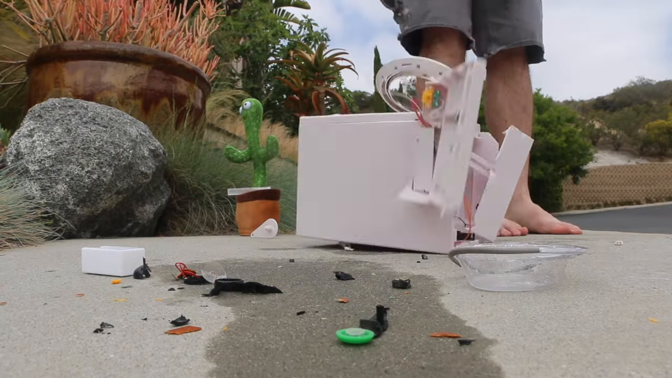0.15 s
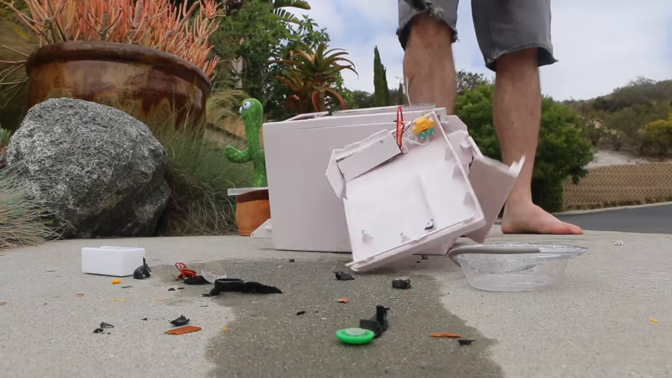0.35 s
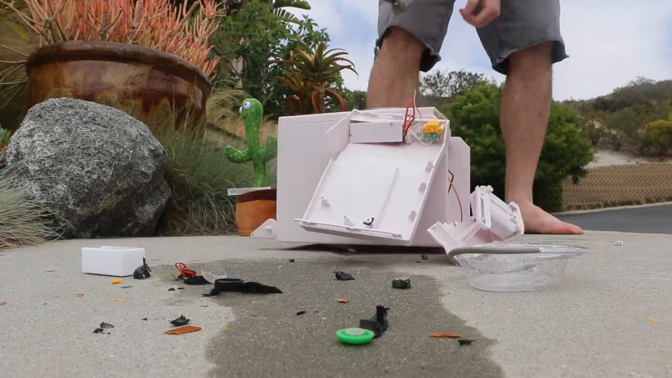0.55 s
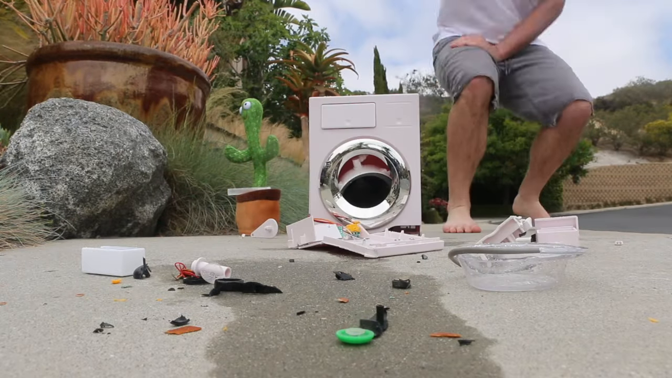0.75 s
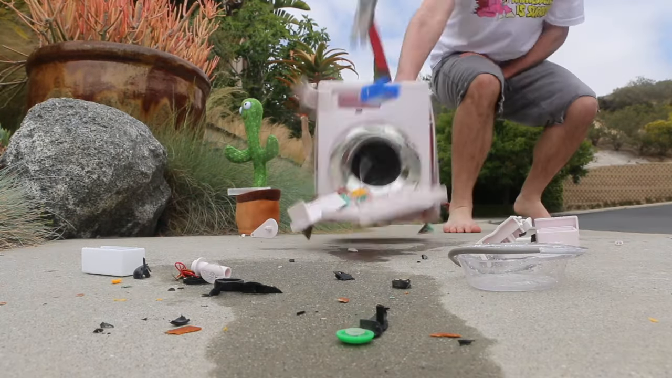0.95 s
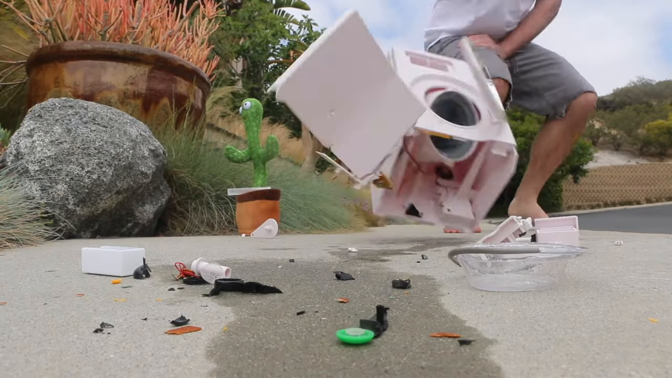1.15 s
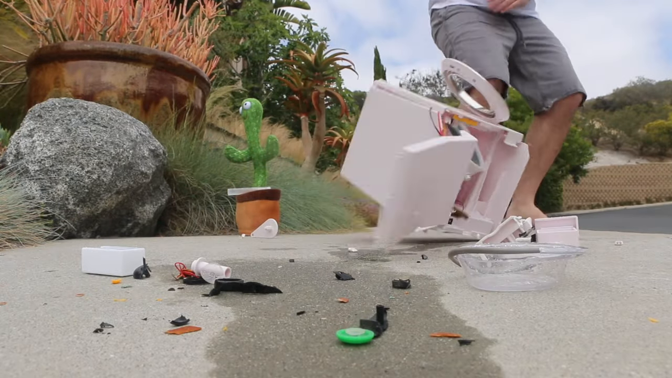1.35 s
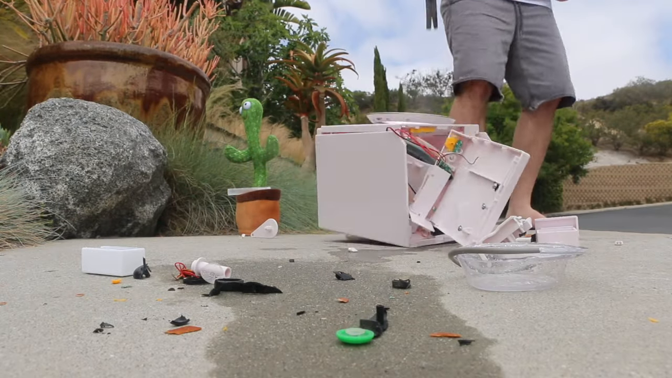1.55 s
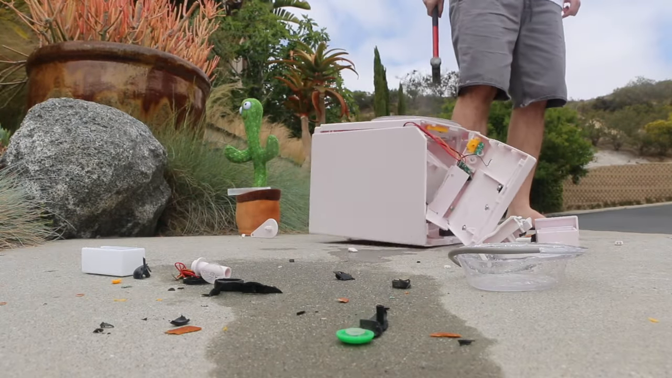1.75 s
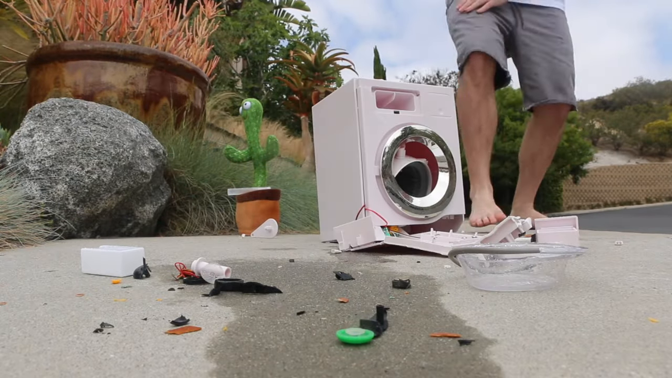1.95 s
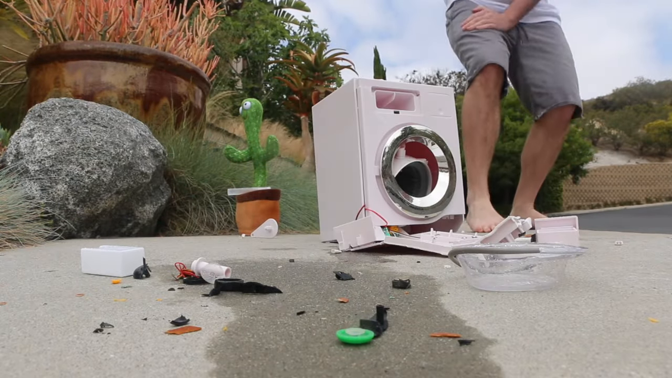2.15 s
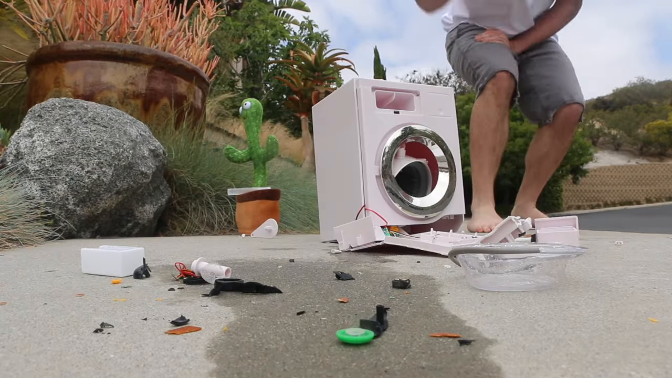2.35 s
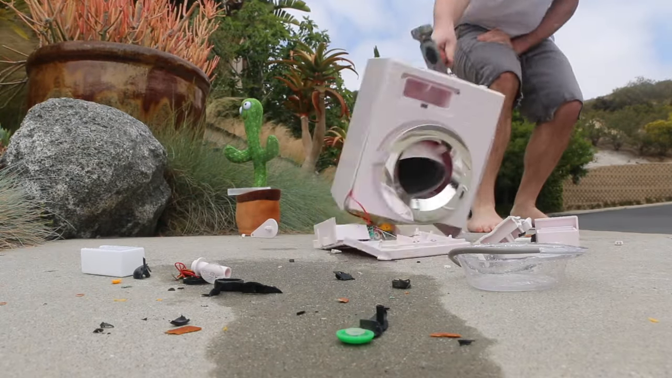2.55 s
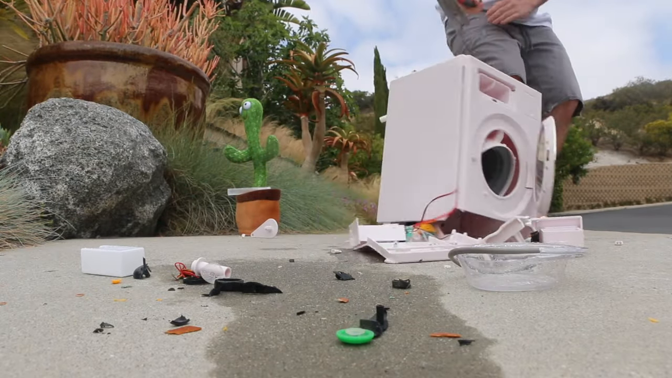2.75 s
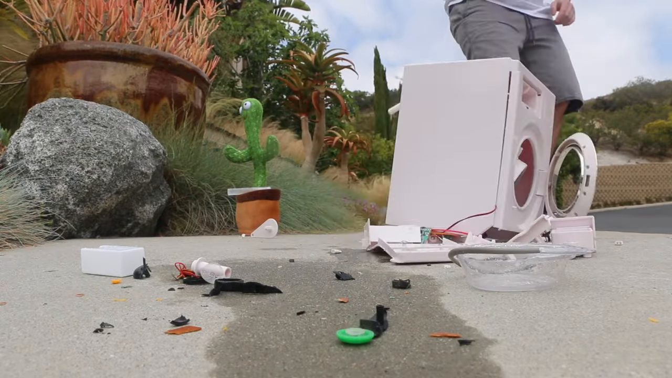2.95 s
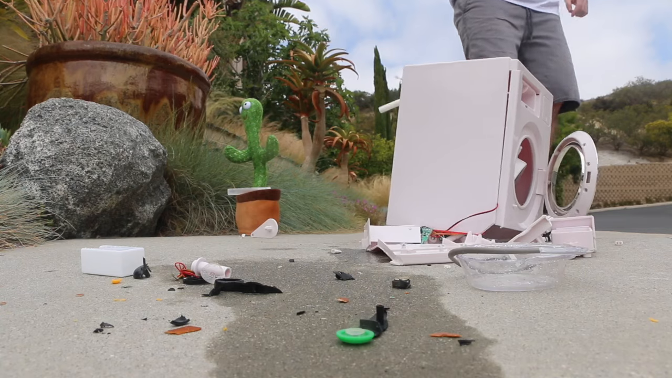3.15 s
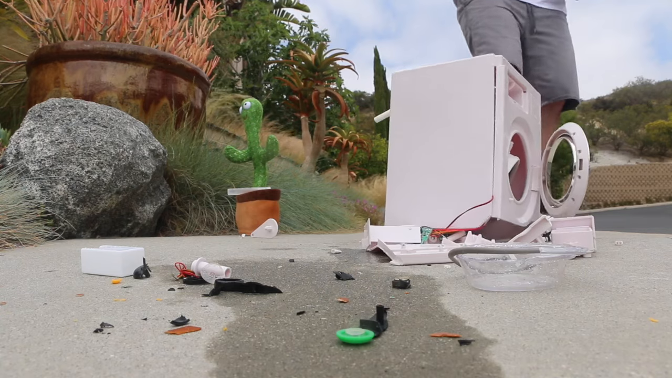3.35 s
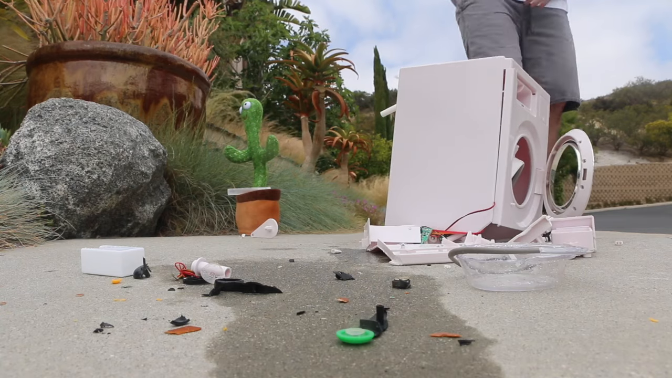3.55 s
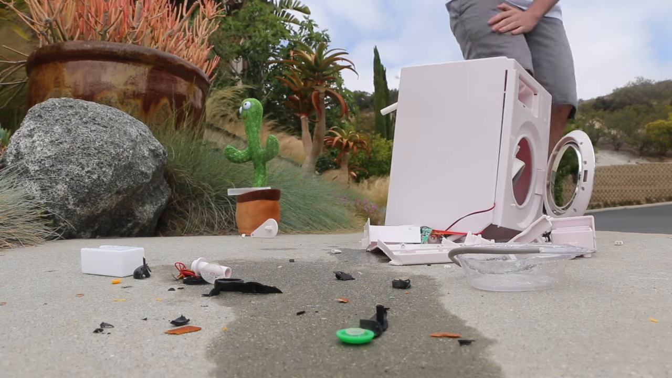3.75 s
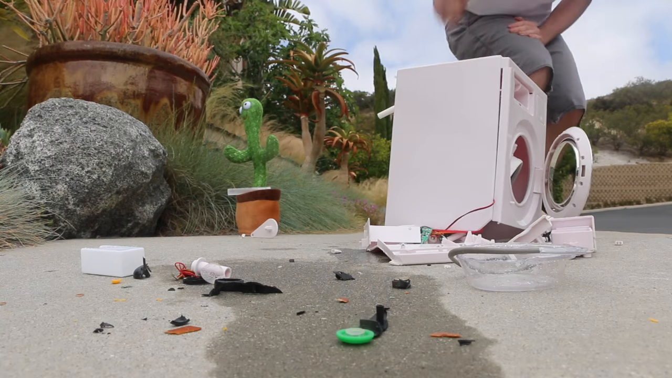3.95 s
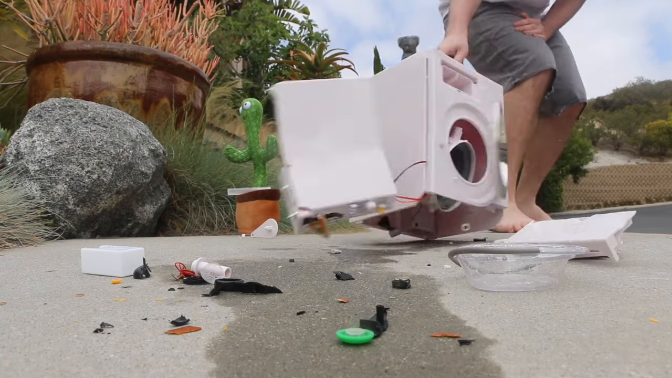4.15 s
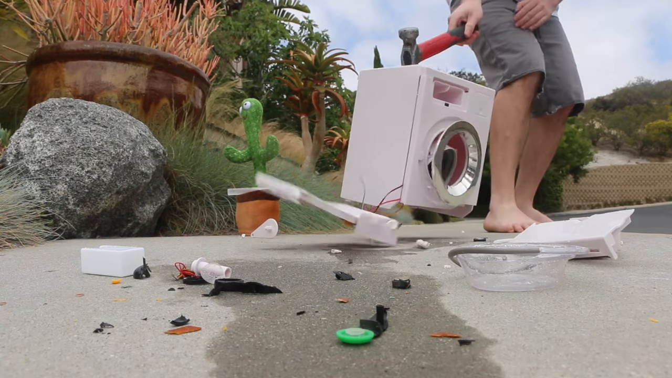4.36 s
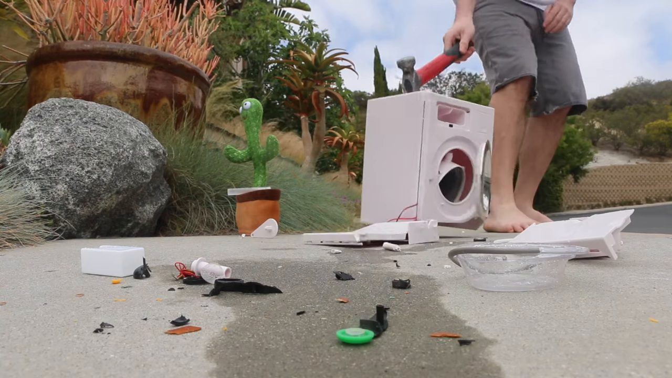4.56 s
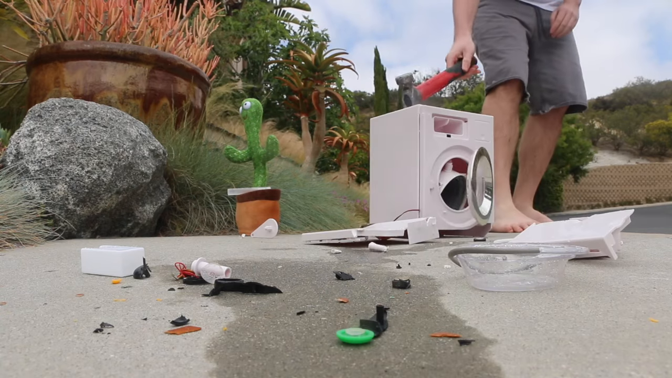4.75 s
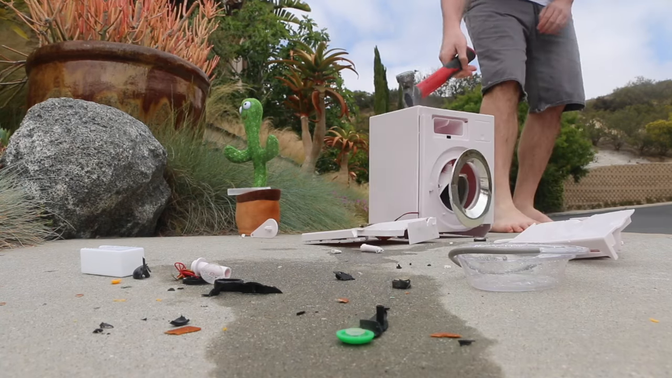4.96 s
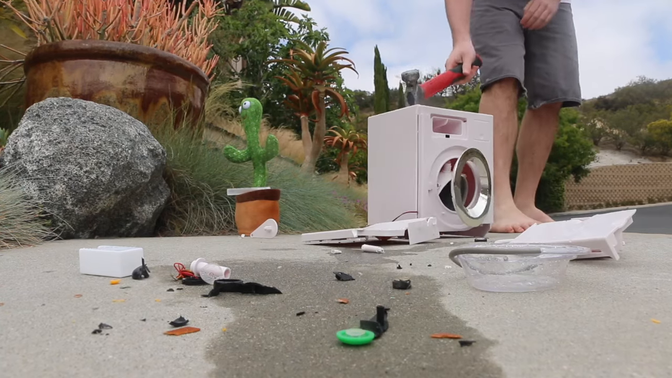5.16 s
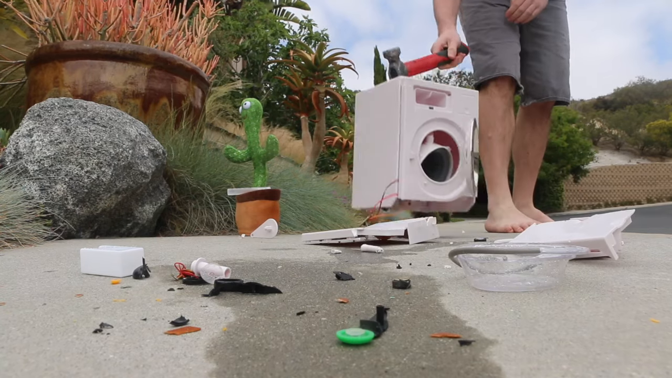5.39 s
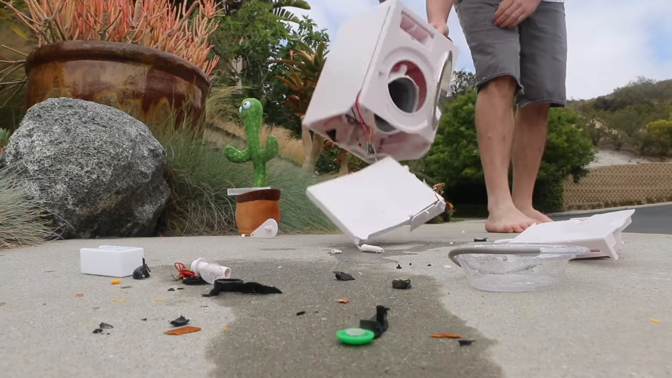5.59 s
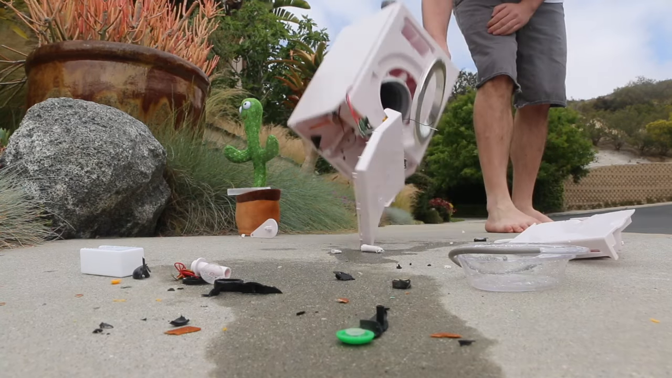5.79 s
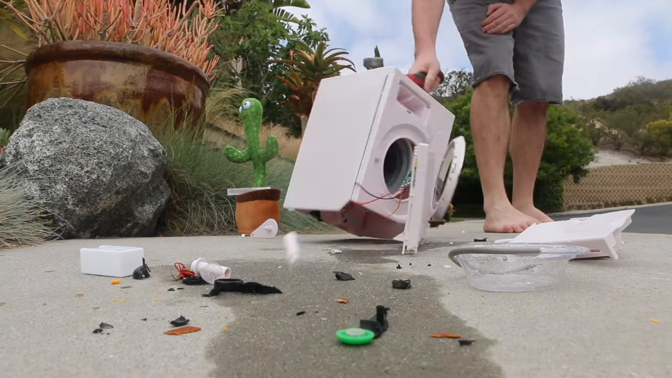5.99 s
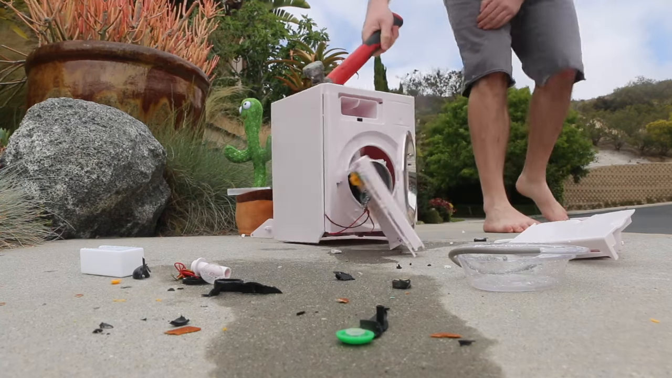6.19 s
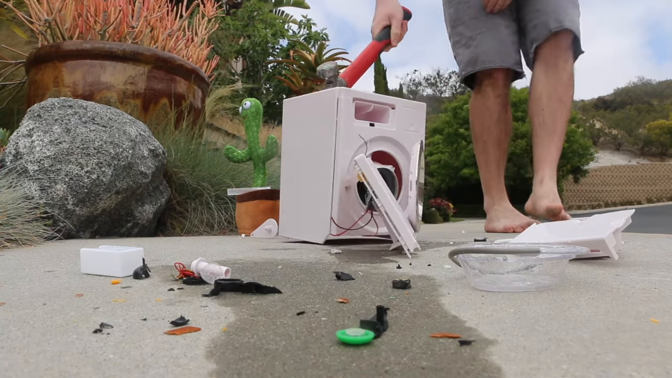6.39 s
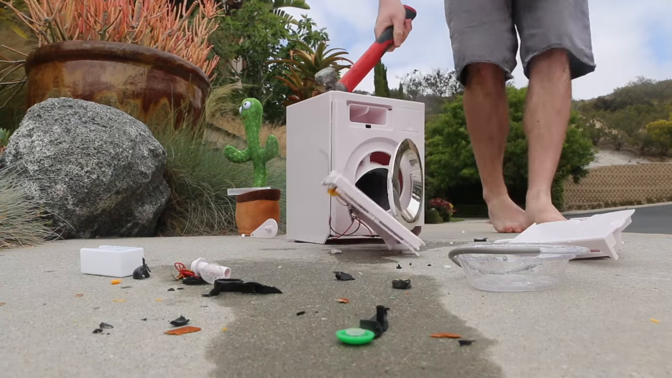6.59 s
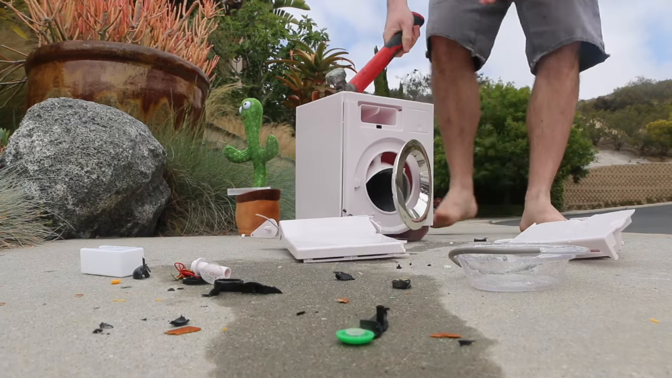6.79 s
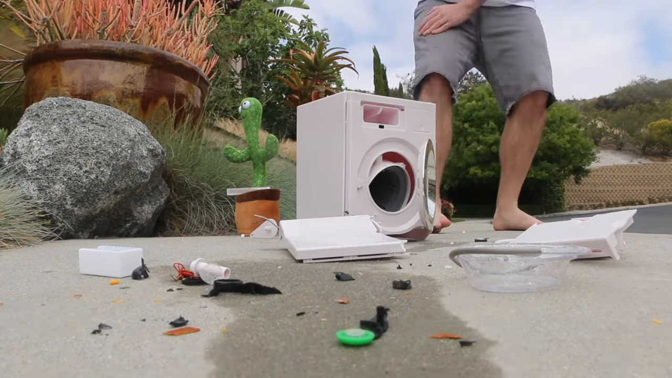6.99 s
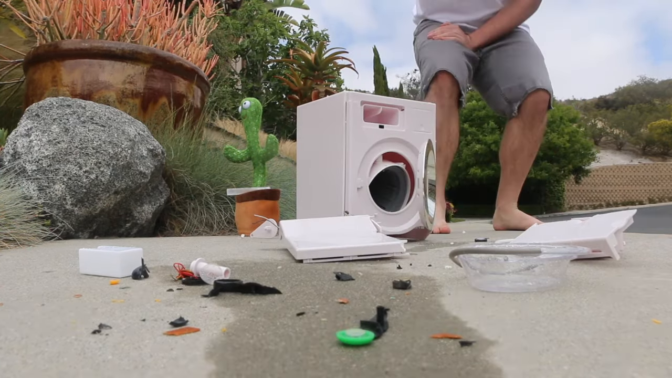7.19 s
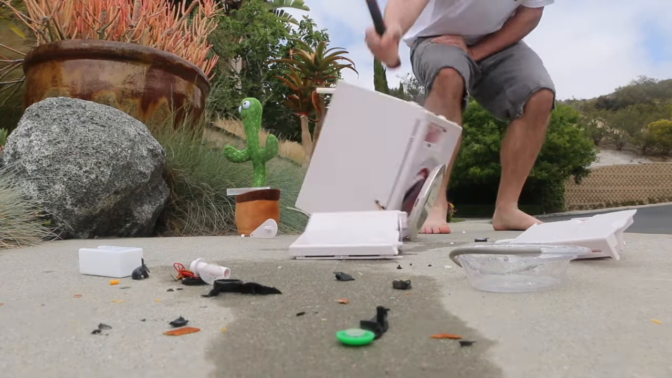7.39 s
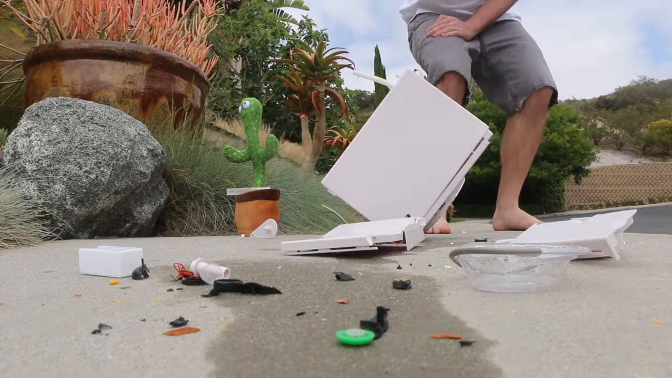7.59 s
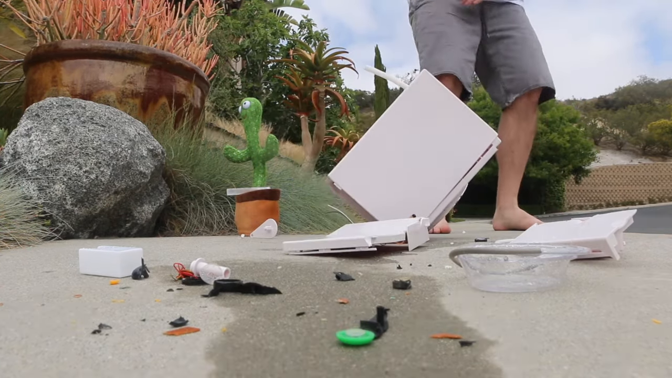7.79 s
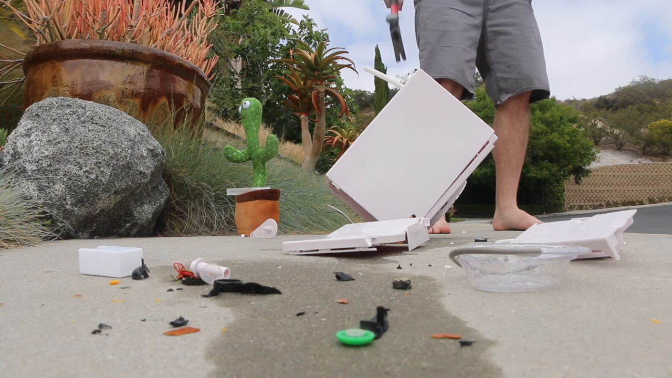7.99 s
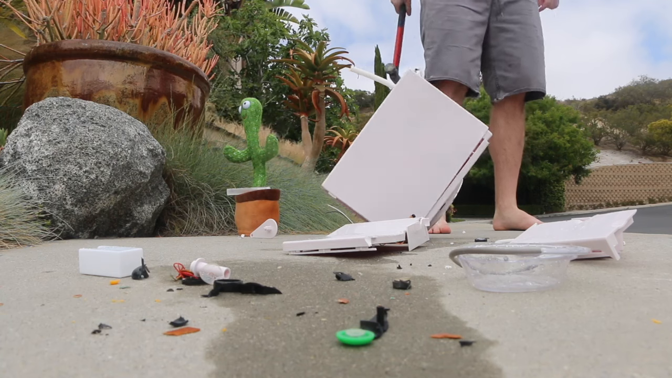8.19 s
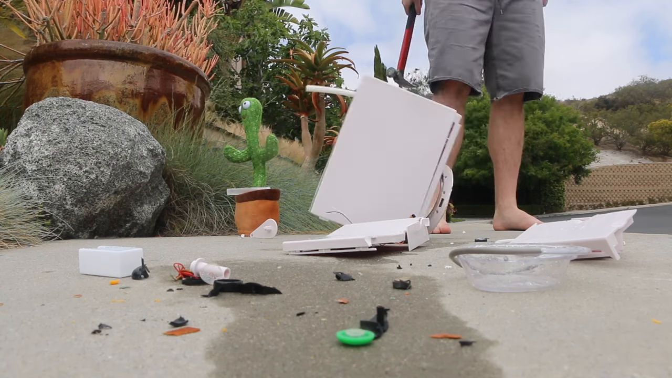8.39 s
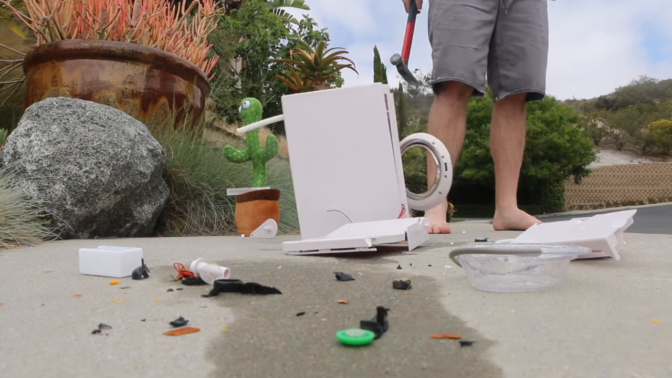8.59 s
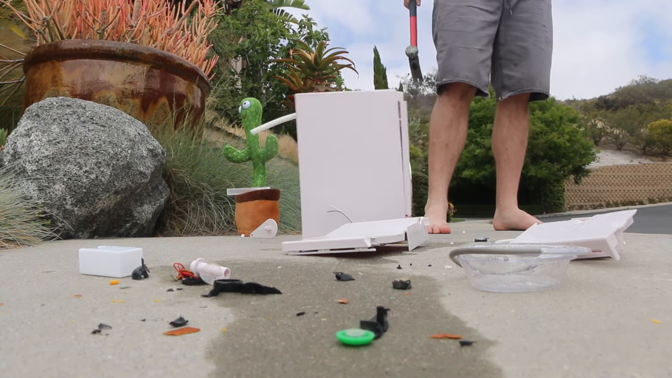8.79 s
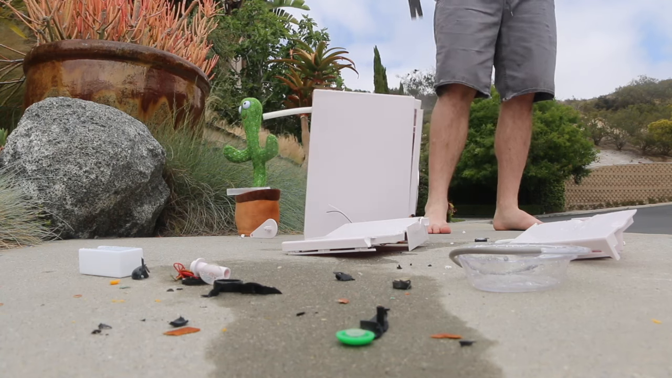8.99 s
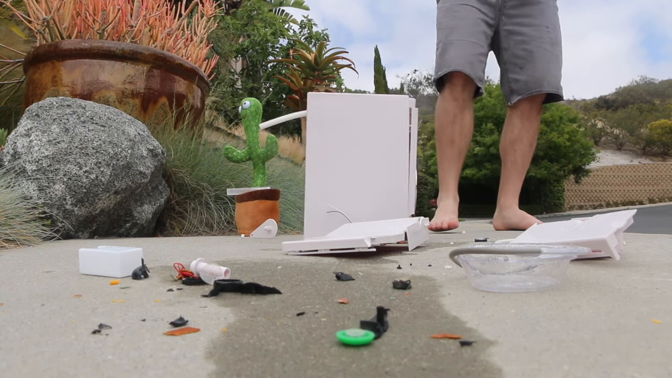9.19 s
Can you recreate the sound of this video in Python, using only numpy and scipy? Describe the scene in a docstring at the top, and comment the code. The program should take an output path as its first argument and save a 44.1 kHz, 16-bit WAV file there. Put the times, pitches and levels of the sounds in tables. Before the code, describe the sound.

Close outdoor stereo pickup of a hollow plastic toy washing machine being smashed on concrete. It starts mid-tumble, with boxy knocks and clacks until about 0.6 s, then a short lull. A very loud, slightly distorted hammer crack at 1.0 s sends it clattering and rattling until 1.9, with small high pings from a hard fragment. A second crack at 2.5 brings denser rattling that fades by 3.2; a third at 4.05 is followed by sharp clacks, a drop at 4.7 and knocks near 5.0. From 5.8 to 6.9 it bangs repeatedly, casing booming and loose panels rattling, with another ping at 6.3. Low wind buffets around 7.0 and 7.3, and the last crack lands at 7.35. Sparse scraping follows, then firm thuds from 8.45 to 9.2 as it rocks to rest. A soft distant wash and faint wavering low hum continue underneath.

```python
"""Four hammer blows crack a plastic toy washing machine on concrete outdoors, close to the microphone.
Between them it tumbles, clacks and rattles, is lifted and dropped, and at the end it rocks to rest.
Impacts are noisy contact forces ringing casing, drum, panel and snap filters; rattling is sparse ticks.
A small hard piece rings as decaying sines; gusts, a distant wash and a wavering hum lie underneath.
The loudest peaks overload and are rounded off."""
import sys
import numpy as np
from scipy import signal
from scipy.fft import rfft, irfft
from scipy.io import wavfile
from scipy.ndimage import uniform_filter1d

SR = 44100
rng = np.random.default_rng(int(sys.argv[2]) if len(sys.argv) > 2 else 0)


def unload_audio(sound):
    """Save the sound as a 16-bit wav file, at the path given as the first command line argument."""
    columns = np.transpose(np.atleast_2d(sound))
    # keep every value between -1 and 1, then stretch to whole-number steps
    steps = np.round(np.clip(columns, -1, 1) * 32767)
    wavfile.write(sys.argv[1], SR, steps.astype(np.int16))


N = 407484
SIZE = 2 ** 14  # samples in one impact
HZ = np.fft.rfftfreq(SIZE, 1 / SR)


def amp(db):
    """Decibels to gain."""
    return 10 ** (np.asarray(db) / 20)


def evened(x):
    """Scales along the last axis to rms 1."""
    return x / np.sqrt(np.mean(x ** 2, -1, keepdims=True) + 1e-20)


def read(points, hz):
    """Reads a table along a log-frequency axis."""
    f, value = np.transpose(points)
    return np.interp(np.log(hz + 1), np.log(f + 1), value)


def add(mix, s, sound):
    """Mixes a sound in at s seconds."""
    part = mix[:, max(round(s * SR), 0):][:, :sound.shape[-1]]
    part += sound[..., :part.shape[1]]


def colour(x, points):
    """Filters a long signal by a table of (frequency [Hz], gain [dB])."""
    return irfft(rfft(x) * amp(read(points, np.fft.rfftfreq(N, 1 / SR))), N)


def causal(gain):
    """Gives a magnitude response the phase of something that rings only after it is struck."""
    log_gain = np.log(np.maximum(gain, gain.max() * 1e-4))
    circle = np.concatenate([log_gain, log_gain[-2:0:-1]])
    minimum_phase = np.exp(np.conj(signal.hilbert(circle)))
    return minimum_phase[:len(gain)]


def resonances(modes):
    """Response of a part: its modes, falling off steeply below and above them."""
    power = sum(amp(db) ** 2 / (1 + ((HZ - hz) / (width / 2)) ** 2) for hz, width, db in modes)
    low_skirt = (1.14 * modes[0][0] / (HZ + 1)) ** 4
    high_skirt = (HZ / (1.23 * modes[-1][0])) ** 4
    return causal(np.sqrt(power / (1 + low_skirt + high_skirt)))


def parts():
    """Responses of the hollow casing, the drum inside it, the flat panels and snapping edges."""
    # modes of each part: (frequency [Hz], width [Hz], relative level [dB])
    casing_modes = [(153, 56, -7.5), (247, 40, -3), (356, 150, -4), (449.5, 34, 1), (535, 73, -1.5),
                    (610, 26, -3.5)]
    drum_modes = [(750, 360, -1), (970, 37, -5.5), (1002.5, 52, 7.5), (1090, 1000, -4.5)]
    panel_modes = [(1420, 49, -16.5), (1760, 400, 2), (2100, 1050, -4), (2836, 260, -1)]
    # spectrum of a hard edge snapping on contact: (frequency [Hz], relative level [dB])
    snap_spectrum = [(1500, -11.5), (3300, 1.5), (5200, -2.5), (7000, -8), (9500, -12), (11000, -12.5),
                     (12500, -43)]
    snap = causal(amp(read(snap_spectrum, HZ)))
    return resonances(casing_modes), resonances(drum_modes), resonances(panel_modes), snap


def own_modes(mode_db, mode_width_hz, count=12):
    """Every impact adds a few narrow resonances of its own, from 1.3 to 9.1 kHz."""
    pitch, size = rng.random((2, count, 1))
    hz = 1300 * 7 ** pitch
    return 1 + (amp(mode_db) * size / (1 + 2j * (HZ - hz) / mode_width_hz)).sum(0)


def contact_force(t, t60, chatter_per_s, first_db, first_s, lump_db):
    """Strength of contact: a hard first hit, then dying chatter of the plastic against itself."""
    lumps = amp(lump_db * rng.standard_normal(SIZE).clip(-2, 2))
    contacts = (rng.random(SIZE) < chatter_per_s / SR) * lumps
    # each contact dies with a 1.4 ms time constant, over a steadier fine crunch
    bursts = signal.lfilter([1], [1, -np.exp(-1 / (0.0014 * SR))], contacts)
    chatter = evened(bursts) + 1.4
    first_hit = amp(first_db) * np.exp(-t / first_s)
    return (chatter + first_hit) * amp(-60 * t / max(t60, .02))


def strike(row, responses, chatter_per_s, first_db, first_s, lump_db, focus_db, mode_db, tilt_db):
    """One impact as mid and side: noise shaped by the contact force drives all four parts."""
    s, thud_hz, *levels_db, t60 = row
    casing, drum, panels, snap = responses
    t = np.arange(SIZE) / SR
    force = contact_force(t, t60, chatter_per_s, first_db, first_s, lump_db)
    # the side that lands stiffens casing and panels differently and favours one region of the low modes
    shift = (thud_hz / 430) ** 0.073
    focus = 1 + amp(focus_db) / (1 + 2j * (HZ - thud_hz) / 55)
    casing = np.interp(HZ / shift, HZ, casing) * focus
    # one panel region, a fixed multiple above the thud, is favoured too
    clack_ratio, clack_width_hz, clack_db = 4.5, 500, 0
    clack = 1 + amp(clack_db) / (1 + 2j * (HZ - clack_ratio * thud_hz) / clack_width_hz)
    panels = np.interp(HZ / shift, HZ, panels) * clack
    piece = own_modes(mode_db, mode_width_hz=130)
    # harder contacts are shorter, so a louder snap is brighter
    db_per_octave = tilt_db + 0.26 * (levels_db[-1] + 21.5)
    brightness = amp(db_per_octave * np.log2(np.clip(HZ, 3000, 11000) / 3000))
    out = np.zeros((2, SIZE))
    for response, db in zip((casing, drum, panels * piece, snap * piece * brightness), levels_db):
        drive = rfft(force * rng.standard_normal((2, SIZE)))
        out += amp(db) * evened(irfft(drive * response))
    fade = np.minimum(1, 10 * (1 - t / t[-1])) ** 2
    level_span_s = .02  # each part carries the energy of its level held this long
    return s, out * fade * np.sqrt(level_span_s * SR / SIZE)


def thump(hz, db, t60):
    """A short low boom: a decaying sine."""
    t = np.arange(SIZE) / SR
    return amp(db - 60 * t / t60) * np.sin(2 * np.pi * hz * t)


def hammer(responses, blow_db=6):
    """Steel cracks the casing and drives it against the slab; the first milliseconds are by far the loudest."""
    # hammer blows, levels before the blow gain: (time [s], thud pitch [Hz], thud level [dB],
    # drum ring level [dB], panel clack level [dB], snap level [dB], t60 [s])
    blows = [(0.983, 345, -10.5, -16.5, -20.5, -18.5, 0.14), (2.483, 520, -18, -17, -20.5, -19.5, 0.15),
             (4.047, 287, -16.5, -14, -21.5, -20, 0.11), (7.355, 340, -15, -19, -18.5, -17.5, 0.12)]
    out = np.zeros((2, N))
    for row in blows:
        s, crack = strike(row, responses, chatter_per_s=1800, first_db=20, first_s=.003,
                          lump_db=-3.0, focus_db=3.5, mode_db=-2, tilt_db=2.0)
        boom = thump(hz=65, db=-18, t60=0.06)
        add(out, s, amp(blow_db) * crack + boom * [[1], [0]])  # the low boom is mid only
    return out


def shared(strength_db, hardness):
    """Splits a knock: a flat face booms the casing, a corner rings the drum, an edge clacks and snaps."""
    # shares from flat face through corner and loose panel to sharp edge, before their sum is evened:
    # (hardness [0-1], casing [dB], drum [dB], panel clack [dB], snap [dB])
    shares = [(0, 2, -12.5, -19, -26.5), (.5, -6.5, -2.5, -6.5, -6), (.75, -11, -16, 6, -15.5),
              (1, -38, -11.5, -4, -0.5)]
    steps, *parts_db = np.transpose(shares)
    db = np.array([np.interp(hardness, steps, part) for part in parts_db])
    total_db = 10 * np.log10(np.sum(amp(db) ** 2))
    return strength_db + db - total_db


def tumbling(responses):
    """Corners and loose panels hit the concrete as the toy tumbles, somersaults, spins, drops and rocks."""
    # casing and panels landing on concrete:
    # (time [s], strength [dB], hardness [0 flat face - 1 sharp edge], thud pitch [Hz], t60 [s, at least 0.02])
    knocks = [ (0.013, -18, 0.28, 480, 0.44), (0.081, -16, .7, 380, 0.092), (0.101, -19, 0.64, 400, 0.021),
              (0.153, -18.5, 0.34, 348, 0.24), (0.192, -16, 0.65, 530, 0.065),
              (0.198, -13.5, 0.26, 354, 0.27), (0.232, -13.5, 0.21, 410, 0.074),
              (0.265, -14, 0.35, 397, 0.23), (0.347, -11, 0.18, 485, 0.21), (0.484, -16.5, 1, 585, 0.024),
              (0.532, -17.5, 0.43, 550, .15), (0.564, -23.5, 0.89, 590, 0.048),
              (0.577, -13, 0.06, 466, 0.03), (1.227, -10, 0.27, 400, 0.37), (1.238, -13, 0.34, 424, 0.043),
              (1.349, -15.5, 0.36, 440, 0.13), (1.4, -16, 0.13, 600, 0.04),
              (1.432, -16.5, 0.82, 373, 0.031), (1.474, -21, 0.23, 445, 0.1),
              (1.503, -13.5, 0.078, 450, 0.059), (1.554, -17, 0.1, 553, 0.049),
              (1.563, -14, 0.33, 400, 0.086), (1.612, -20.5, 0.086, 570, 0.045),
              (1.672, -16, 0.27, 570, 0.088), (1.703, -18, 0.79, 415, 0.026),
              (1.868, -17, 0.21, 384, 0.087), (1.894, -18, .13, 490, 0.082), (2.664, -21, 0.46, 344, 0.048),
              (2.721, -11.5, 0.26, 265, 0.084), (2.786, -20.5, 0.6, 465, 0.2),
              (2.804, -15, 0.26, 430, 0.089), (2.863, -19.5, 0.38, 346, 0.12), (2.928, -20, 0.9, 415, 0.16),
              (2.983, -17, 0.34, 450, 0.14), (3.037, -24, .02, 338, 0.032), (3.065, -28, .55, 500, 0.059),
              (3.115, -27.5, 0.95, 630, 0.04), (3.23, -33.5, 0.63, 660, 0.072),
              (4.282, -16, 0.59, 565, .14), (4.333, -19.5, 0.38, 430, 0.086),
              (4.402, -19.5, 0.95, 463, 0.32), (4.462, -20, 1, 350, 0.02), (4.47, -12, .95, 470, 0.14),
              (4.59, -28.5, .92, 550, 0.025), (4.679, -11, 0.56, 493, 0.037), (5.012, -16, 0.19, 470, 0.39),
              (5.027, -14, 0.18, 500, 0.054), (5.176, -18, 0.16, 250, .13), (5.549, -23.5, 0.53, 517, 0.2),
              (5.855, -14.5, 0.14, 580, 0.15), (5.878, -23.5, 0.32, 477, 0.072),
              (5.89, -9.5, 0.46, 445, 0.09), (5.92, -10.5, .53, 503, 0.26), (6.011, -19.5, 0.4, 470, .07),
              (6.14, -12.5, 0.21, 540, 0.2), (6.172, -17, 0.071, 550, 0.11),
              (6.273, -11.5, 0.3, 473, 0.091), (6.361, -9.5, 0.16, 356, 0.12),
              (6.445, -29, 0.65, 445, .045), (6.528, -13, 0.34, 356, 0.14), (6.545, -13.5, 0.16, 308, .055),
              (6.646, -13, 0.19, 370, 0.091), (6.709, -9, 0.11, 434, 0.33), (6.759, -16.5, 0.91, 520, .16),
              (6.891, -13.5, 0.13, 355, 0.094), (7.581, -18.5, 0.39, 343, 0.72),
              (7.775, -24.5, 0.37, 403, 0.28), (7.867, -29.5, 0.42, 370, 0.099),
              (8.169, -23.5, 0.62, 430, 0.062), (8.23, -37.5, .72, 415, 0.053),
              (8.451, -20.5, 0.12, 634, .13), (8.574, -8, 0.14, 432, 0.1), (8.671, -24.5, 0.33, 434, 0.067),
              (8.817, -13, .42, 464, 0.076), (8.877, -10, 0.11, 343, 0.17), (9.085, -12.5, 0.13, 456, 0.11),
              (9.224, -19.5, 0.011, 333, 0.097)]
    out = np.zeros((2, N))
    for s, strength_db, hardness, thud_hz, t60 in knocks:
        row = s, thud_hz, *shared(strength_db, hardness), t60
        add(out, *strike(row, responses, chatter_per_s=590, first_db=-8, first_s=.0013,
                         lump_db=3.0, focus_db=5.0, mode_db=5, tilt_db=1.0))
    return out


def shaking():
    """How strongly casing and small parts are shaken: quick attack, build with speed, release at rest."""
    # spells of loose parts shaking and sliding while the toy moves, levels before each part's own gain:
    # (start [s], length [s], casing level [dB], small parts level [dB])
    spells = [(0.0, 0.07, -19, -25.5), (0.39, 0.22, -19.5, -30.5), (1.01, 0.71, -20.5, -30),
              (2.521, 0.44, -18, -27), (3.13, 0.038, -37.5, -35), (3.374, 0.045, -31, -44.5),
              (4.091, 0.29, -21, -28), (4.457, .13, -32.5, -25.5), (4.702, .12, -25.5, -34),
              (5.186, 0.069, -24.5, -38), (5.779, 0.63, -19.5, -30), (6.585, 0.22, -22.5, -33),
              (7.382, 0.41, -25, -32), (8.24, 0.21, -34, -51), (8.423, 0.057, -27.5, -49),
              (8.615, 0.084, -26, -42), (8.897, 0.36, -33, -53)]
    attack_s, rise_db, release_db_per_s = 0.0067, 4.5, 149
    out = np.zeros((2, N))
    for start, length, casing_db, small_db in spells:
        t = np.arange(N) / SR - start
        attack = np.clip(t / attack_s, 0, 1)
        build_db = rise_db * (np.clip(t / length, 0, 1) - 1)
        release_db = release_db_per_s * np.maximum(t - length, 0)
        out += amp([[casing_db], [small_db]]) * attack * amp(build_db - release_db)
    return out


def shifting(x, patch_db, patch_s, patch_hz):
    """As the points of contact move, different resonances come and go."""
    hz, t, z = signal.stft(x, SR, nperseg=512, noverlap=384)
    field = rng.standard_normal(z.shape[1:])
    field = uniform_filter1d(field, max(round(patch_s / t[1]), 1), axis=1)
    field = evened(uniform_filter1d(field, max(round(patch_hz / hz[1]), 1), axis=0))
    return signal.istft(z * amp(patch_db * field.clip(-2, 2)), SR, nperseg=512, noverlap=384)[1][:, :N]


def rattling(responses, ticks_per_s=400, spread_db=-2.0, grit_db=-19,
             casing_db=-6.5, drum_db=-10, clack_db=-5, snap_db=-9):
    """Scraping and many small contacts excite the same parts while the toy moves."""
    low, high = shaking()
    tick_gain = amp(spread_db * np.minimum(rng.exponential(1, N), 3))
    ticks = (rng.random(N) < ticks_per_s / SR) * tick_gain
    scrape = ticks + amp(grit_db)
    levels = low * amp(casing_db), low * amp(drum_db), high * amp(clack_db), high * amp(snap_db)
    out = np.zeros((2, N))
    for response, level in zip(responses, levels):
        drive = scrape * rng.standard_normal((2, N))
        out += level * evened(signal.oaconvolve(drive, irfft(response)[None], axes=1)[:, :N])
    # light contacts carry less treble than blows
    out = colour(out, [(3500, 0.077), (10000, -4.2)])
    return shifting(out, patch_db=3.5, patch_s=.02, patch_hz=700)


def small_piece():
    """A hard fragment rings with a few high modes on each bounce."""
    # bounces, levels before the mode levels:
    # (time [s], pitch of the lowest mode [Hz], lowest mode level [dB], upper modes level [dB])
    pings = [(1.311, 3180, -9.5, -10.5), (1.45, 2740, -44, -18), (1.648, 2540, -6.5, -26),
             (1.763, 2610, -16, -29), (1.794, 2330, -14, -45), (1.834, 2650, -14, -24),
             (6.334, 2770, -9, -17.5), (6.6406, 2770, -26, -17)]
    # bending modes: (multiple of the lowest, relative level [dB], t60 [s])
    bending_modes = [(1, -9, 0.043), (2.02, -14, .03), (2.83, -2.5, 0.012)]
    out, t = np.zeros((2, N)), np.arange(SIZE) / SR
    for s, hz, low_db, high_db in pings:
        for k, (multiple, db, t60) in enumerate(bending_modes):
            phase = 2 * np.pi * (hz * multiple * t + rng.random((2, 1)))
            bounce_db = high_db if k else low_db
            add(out, s, amp(db + bounce_db - 60 * t / t60) * np.sin(phase))
    return out


def yard(x, wet_db=-17, delay=0.0097):
    """A thin open-air tail, fading in over the delay, each band dying at its own speed."""
    # scatter from the rock, pot and shrubs: (frequency [Hz], t60 [s])
    scatter = [(150, 0.21), (1000, 0.19), (3000, 0.1), (9000, 0.11)]
    hz, t, z = signal.stft(rng.standard_normal((2, SIZE)), SR, nperseg=256)
    decay = amp(-60 * t / read(scatter, hz)[:, None])
    tail = signal.istft(z * decay * np.minimum(t / delay, 1), SR, nperseg=256)[1]
    return amp(wet_db) * signal.oaconvolve(x, tail / np.linalg.norm(tail[0]), axes=1)[:, :N]


def breeze():
    """Gusts buffet each microphone port separately with a lumpy rumble."""
    # gusts on the microphone: (time of the peak [s], peak level [dB], rise [s], fall [s])
    gusts = [(6.97, -27.5, 0.017, 0.054), (7.2, -39, 0.17, 0.17), (7.313, -18, 0.032, 0.029)]
    fade_db = 19  # lost over one rise or fall time
    t = np.arange(N) / SR
    level = 0
    for s, db, rise, fall in gusts:
        level = level + amp(db - fade_db * np.maximum((s - t) / rise, (t - s) / fall))
    rumble = colour(rng.standard_normal((2, N)), [(15, -19), (80, 3), (170, -8.0), (350, -26), (900, -67)])
    return level * evened(rumble)


def outdoors(swell_db=-0.95, waver_hz=2.34):
    """A distant wash that swells a little, with a faint wavering hum."""
    # steady outdoor wash: (frequency [Hz], relative density [dB per Hz])
    air = [(20, -21), (60, -10), (120, 1), (150, -5), (210, -0.5), (320, -7.5), (600, -7), (900, -4.5),
           (1400, -11), (2400, -25), (4500, -29.5), (11000, -42), (13000, -67)]
    air_db, hum_hz, hum_db = -39, 124, -53
    t = np.arange(N) / SR
    drift = sum(np.sin(2 * np.pi * (f * t + rng.random((2, 1)))) / np.sqrt(f)
                for f in np.geomspace(.5, 12, 20))
    swell, waver = evened(drift)
    wash = amp(air_db + swell_db * swell) * evened(colour(rng.standard_normal((2, N)), air))
    hum = np.sin(2 * np.pi * np.cumsum(hum_hz + waver_hz * waver) / SR)
    return wash + amp(hum_db) * evened(hum)


def scene():
    """The toy sits in the middle; the image widens toward the treble."""
    # stereo width: (frequency [Hz], side gain [dB])
    width = [(60, -22), (160, -26.5), (400, -29.5), (1000, -25.5), (2500, -14), (5000, -8), (10000, -4)]
    responses = parts()
    toy = hammer(responses) + tumbling(responses) + rattling(responses) + small_piece()
    mid, side = toy + yard(toy) + outdoors()
    side = colour(side, width)
    return np.array([mid + side, mid - side]) + breeze()


def low_pass(x, hz):
    """A steep band limit."""
    return signal.oaconvolve(x, signal.firwin(201, hz, window=("kaiser", 7), fs=SR)[None], "same")


def record(dry):
    """Limits the treble, then rounds off the loudest peaks, whose overload splashes higher; then a final band limit."""
    treble_hz, edge_hz, ceiling = 11700, 15800, 0.97
    limited = low_pass(dry, treble_hz)
    clipped = limited / (1 + (limited / ceiling) ** 8) ** (1 / 8)
    return low_pass(clipped, edge_hz)


dry = scene()
out = record(dry)
unload_audio(out)
```